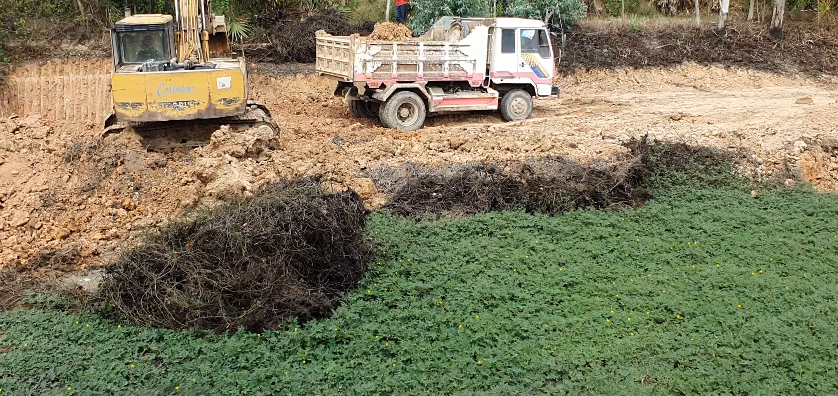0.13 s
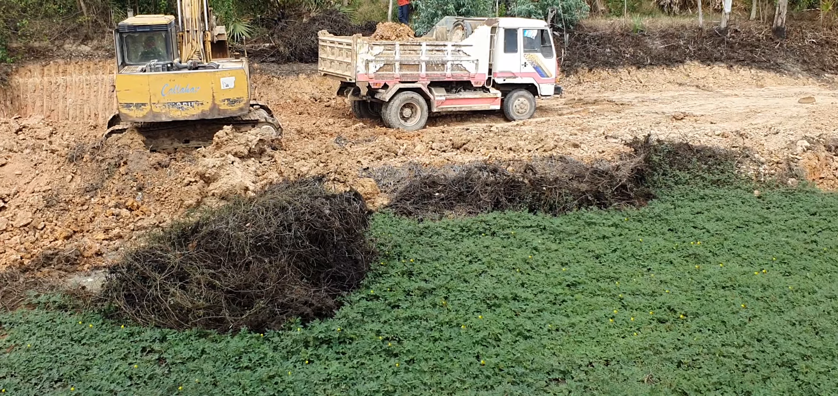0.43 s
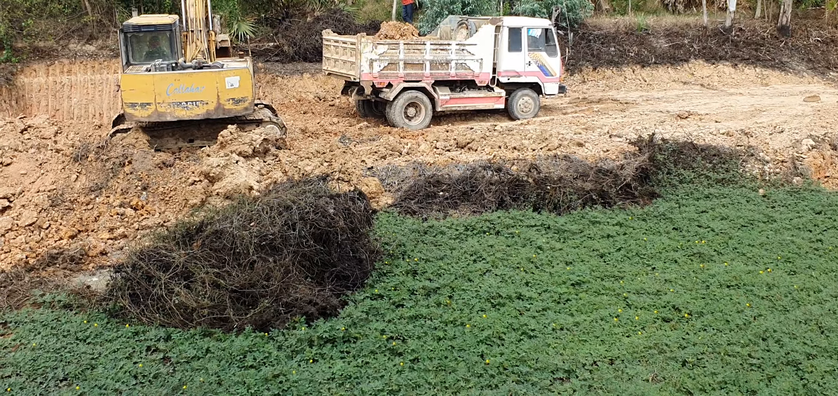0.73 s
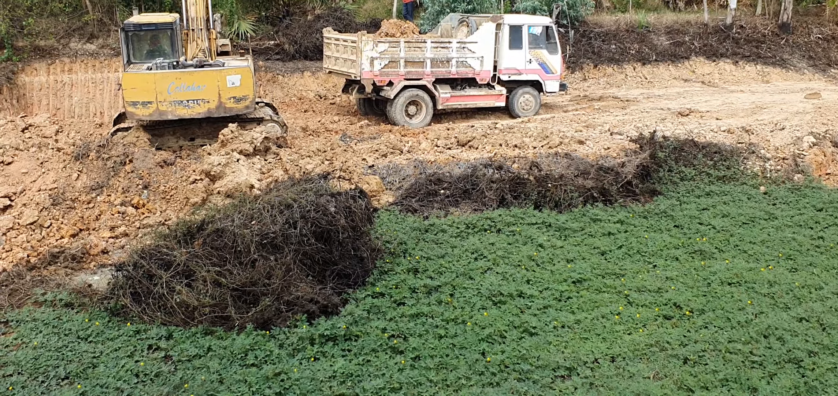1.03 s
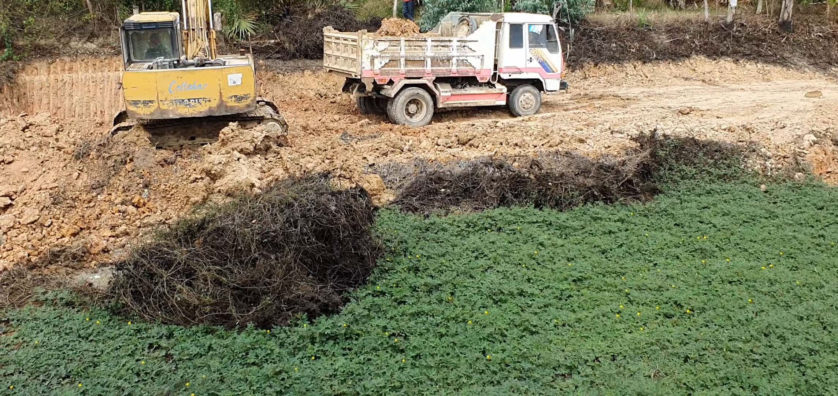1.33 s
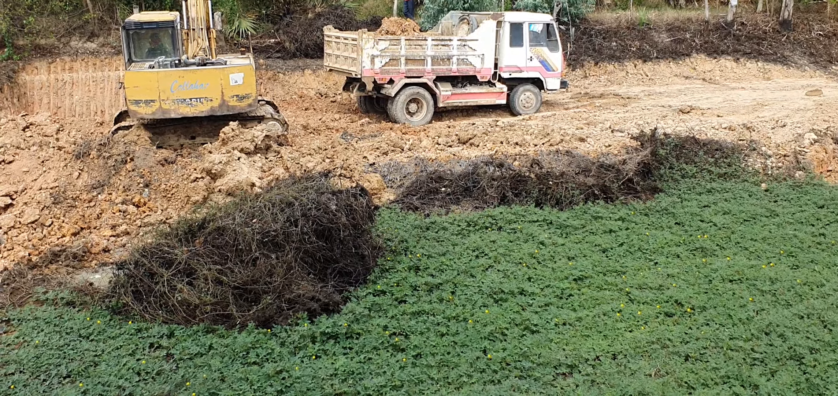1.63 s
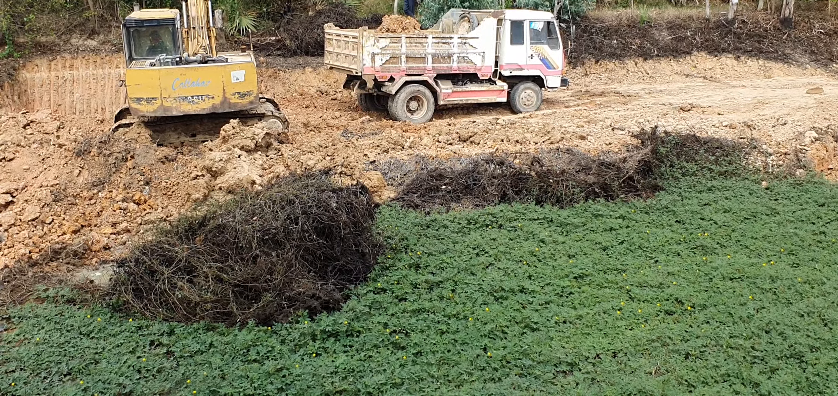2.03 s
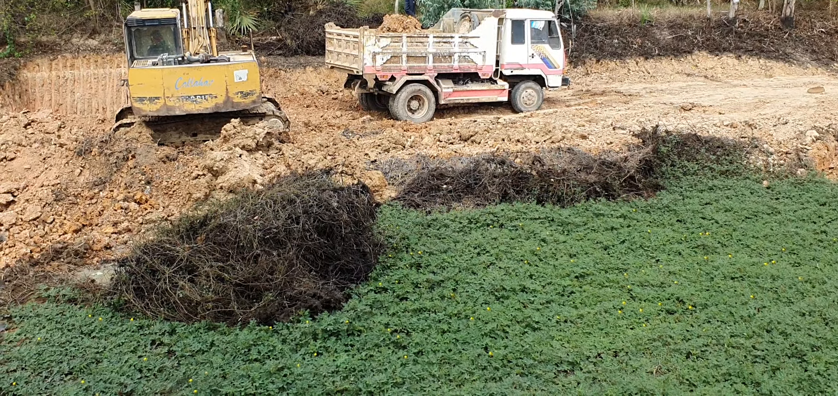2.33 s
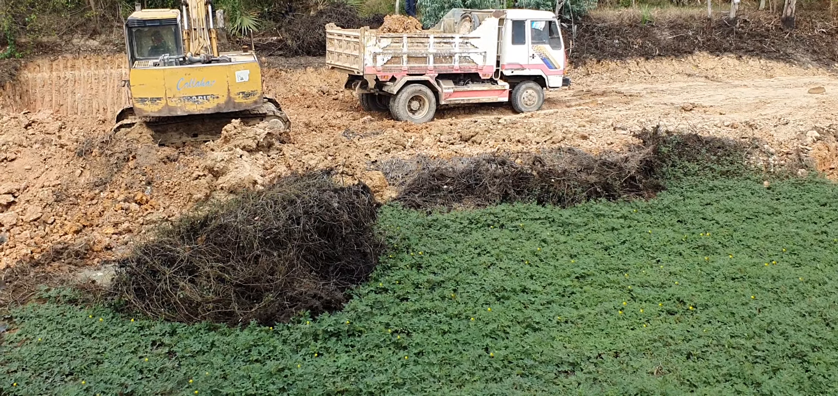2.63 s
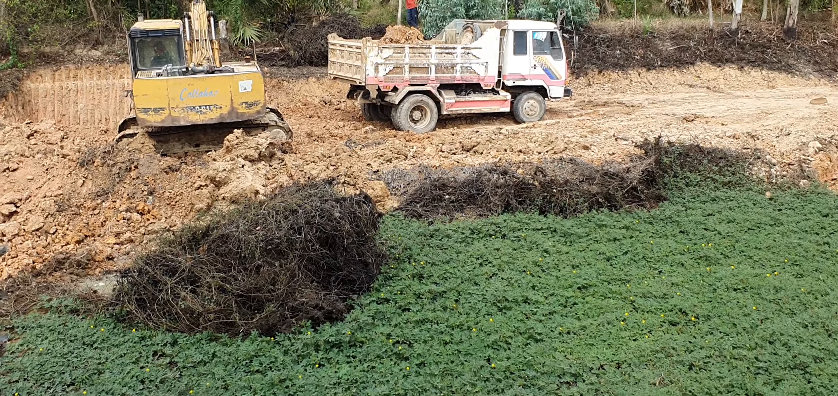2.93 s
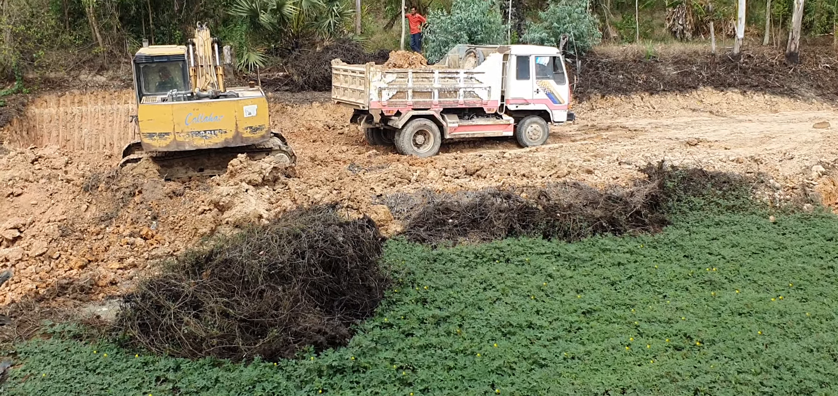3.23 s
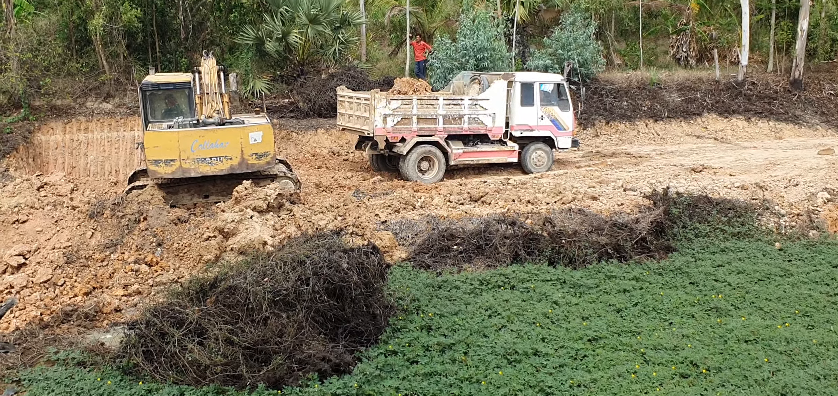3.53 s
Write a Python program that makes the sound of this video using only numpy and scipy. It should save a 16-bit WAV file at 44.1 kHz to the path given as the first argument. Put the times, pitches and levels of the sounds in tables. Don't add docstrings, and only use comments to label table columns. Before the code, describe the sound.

An excavator's diesel engine rumbles steadily with fan roar and a low hydraulic whine, some way off in an open field; midway the bucket knocks dully, then loose metal ticks; stereo microphone, slightly left, no echo.

```python
import sys
import numpy as np
from scipy import signal
from scipy.fft import rfft, irfft
from scipy.io import wavfile

SR = 44100
rng = np.random.default_rng(int(sys.argv[2]) if len(sys.argv) > 2 else 0)


def file_out(sig):
    cols = np.atleast_2d(sig).T
    lim = np.clip(cols, -1, 1)
    pcm = np.round(lim * 32767).astype(np.int16)
    wavfile.write(sys.argv[1], SR, pcm)


def elevation(decibels):
    levels = np.asarray(decibels, float)
    return 10 ** (levels / 20)


N = 161847
PUMP_PER_FIRING = 5
TOP_HZ = 15750


def in_time(rows):
    s, *columns = np.transpose(rows)
    return [np.interp(np.arange(N) / SR, s, column) for column in columns]


def at_hz(points, hz):
    points = np.array(points)
    return np.interp(np.log(hz + 1), np.log(points[:, 0]), points[:, 1])


def rms_one(x):
    return x / np.sqrt(np.mean(x ** 2) + 1e-20)


def drift(rate):
    r = np.exp(-80 * np.pi * rate / SR)
    slow = signal.lfilter([1], [1, -2 * r, r * r], rng.standard_normal(N // 40 + 2002))
    slow = slow[2000:]
    return np.interp(np.arange(N) / 40, np.arange(len(slow)), rms_one(slow - slow.mean()))


def ring(clicks, hz, t60):
    r, w = elevation(-60 / (t60 * SR)), 2 * np.pi * hz / SR
    return signal.lfilter([0, np.sin(w)], [1, -2 * r * np.cos(w), r * r], clicks + 1e-18)


def pan(x, db):
    return x * np.array([[2 * elevation(db)], [2]]) / (1 + elevation(db))


def hiss(colour_db, patchy_db):
    # f/Hz, share (0..1)
    likeness = [(60, .97), (300, .97), (800, .85), (1500, .64), (2500, .52), (3300, .2), (6200, .52),
                (7500, .27)]
    hz = np.fft.rfftfreq(N, 1 / SR)
    shared, *own = rfft(rng.standard_normal((3, N)))
    alike = np.clip(at_hz(likeness, hz), 0, 1)
    pair = np.sqrt(alike) * shared + np.sqrt(1 - alike) * np.array(own)
    pair = pair * elevation(colour_db(hz))
    if not patchy_db:
        return rms_one(irfft(pair, N))
    place = np.clip(2 * np.log2((hz + 1) / 40), 0, 17)
    together = drift(2.5)
    out = 0
    for k in range(18):
        band = irfft(pair * np.clip(1 - abs(place - k), 0, 1), N)
        out = out + band * elevation(patchy_db * (0.3 * together + drift(11.7)))
    return rms_one(out)


def truck_idle():
    phase = 2 * np.pi * 69.1 * np.arange(N) / SR + drift(1.3)
    return np.sqrt(2) * pan(elevation(-39.5 + 0.83 * drift(3)) * np.sin(phase), 1.5)


def roar():
    # f/Hz, level/dB per Hz
    low = [(25, -36), (45, -2), (80, -2.5), (150, -4.5), (230, -1), (340, -1.5), (450, -6), (700, -9)]
    high = [(800, -2.5), (1300, -5), (2900, -15), (3600, -19.5), (6500, -31.5), (9800, -32.5), (11500, -31),
            (15700, -35)]
    # f/Hz, width/Hz, level/dB
    panels = [(587, 17.4, 10), (371, 9.6, 5), (492, 43, 3), (833, 145, 3.5), (1156, 29, 5), (1735, 46, -13),
              (427, 37, -3), (157, 8.5, -25), (330, 8.7, -3), (540, 8.2, 4), (1920, 910, 6.5),
              (7640, 830, -2.5), (14800, 1200, -1), (6330, 720, 7)]

    def colour(hz):
        base = np.where(hz < 750, at_hz(low, hz), at_hz(high, hz) - 9)
        return base + sum(db / (1 + (2 * (hz - f) / width) ** 2) for f, width, db in panels)
    return elevation(-26.5) * hiss(colour, patchy_db=0.8)


def earth_slides():
    # start t/s, attack/s, decay/s, level/dB, centre f/Hz, width/octaves
    pours = [
        (0.922, 0.02, 0.12, -40.5, 2770, 0.85),
        (1.765, 0.35, 0.36, -41, 1980, 0.45),
        (2.6, .01, 0.085, -55, 1300, 1.3),
    ]
    out, t = 0, np.arange(N) / SR
    for s, attack, decay, db, hz, wide in pours:
        after = np.maximum(t - s, 0)
        shape = np.minimum(after / attack, 1) * np.exp(-np.maximum(after - attack, 0) / decay)
        grains = hiss(lambda f: -12 * (np.log2((f + 1) / hz) / wide) ** 2, patchy_db=0)
        out = out + elevation(db + 2.0 * drift(30)) * shape * grains
    return out


def pin_squeaks():
    # start t/s, length/s, f/Hz, level/dB
    squeaks = [
        (.45, .15, 8750, -60),
        (.49, .15, 8450, -62),
    ]
    out, t = np.zeros(N), np.arange(N) / SR
    for s, length, hz, db in squeaks:
        bow = np.sin(np.pi * np.clip((t - s) / length, 0, 1)) ** 0.54
        out += elevation(db + 2.7 * drift(30)) * bow * np.sin(2 * np.pi * hz * t + 1.2 * drift(40))
    return pan(out, -1.5)


def metal_ticks():
    # t/s, level/dB, pitch factor
    ticks = [(0.5921, -47, 1), (1.7056, -50, 1.9), (1.734, -49, 1.9), (2.0683, -52, 2.6),
             (2.5043, -48, 1.85), (2.5342, -53, 1.9), (2.652, -50, 1), (2.7604, -45, 1), (3.075, -54, 1.5),
             (3.1602, -47, 1), (3.1802, -48, 1), (3.182, -54, 1.5), (3.2326, -49, 1), (3.2345, -50, 1.5),
             (3.2544, -46, 1), (3.2715, -45, 1), (3.3094, -48, 1), (3.4925, -49, 1), (3.6003, -46, 1)]
    # f/Hz, level/dB, t60/s
    modes = [(5700, -2, .025), (6000, -3, .02), (5300, -8, .025), (4700, -15, .02), (8450, -15, .02),
             (8900, -16, .02)]
    out = np.zeros(N)
    s, db, pitch = np.transpose(ticks)
    chance_db = rng.normal(0, 2.1, (len(s), len(modes)))
    for k, (hz, mode_db, t60) in enumerate(modes):
        heights = elevation(db + mode_db + 5.5 + chance_db[:, k])
        for size in set(pitch):
            clicks = np.zeros(N)
            clicks[(s * SR).astype(int)] = heights * (pitch == size) * (hz * size < TOP_HZ)
            out += ring(clicks, min(hz * size, TOP_HZ), t60)
    return pan(out, -1.5)


def bucket_knocks():
    # t/s, level/dB, pitch factor, other modes re main/dB, ring length factor
    hits = [
        (.966, -15, .942, -18, 1.7),
        (1.593, -19, 1.0, -1, 1),
        (1.616, -32, 1.0, 9, 1.2),
    ]
    # f/Hz, level/dB, t60/s
    bucket = [(345, 2, .25), (904, 0, .085), (1147, -3, .2), (1249, -3, .08), (1362, -6, .09),
              (1523, 0, .12), (1857, -4, .1), (2008, -7, .13), (2229, -7, .11)]
    dull_hz, thud_db, thud_t60, main_mode = 2700, -8.5, 0.13, 1
    out, t = np.zeros(N), np.arange(N) / SR
    thud_band = signal.butter(2, [300, dull_hz], "band", fs=SR, output="sos")
    grit = rms_one(signal.sosfilt(thud_band, rng.standard_normal(N)))
    for s, db, pitch, rest_db, longer in hits:
        click = elevation(db) * (np.arange(N) == int(s * SR))
        for k, (hz, mode_db, t60) in enumerate(bucket):
            height_db = mode_db - 4 + rest_db * (k != main_mode) + rng.standard_normal()
            out += elevation(height_db) * ring(click, hz * pitch, t60 * longer)
        fall_db = 60 * np.maximum(t - s, 0) / thud_t60
        out += (t > s) * elevation(db + rest_db + thud_db - fall_db) * grit
    return pan(signal.sosfilt(signal.butter(6, dull_hz, fs=SR, output="sos"), out), 1.1)


def valve_clatter(turns):
    # t/s, level/dB
    load = [(0, -74), (.35, -60), (.9, -66), (1.3, -53.5), (1.6, -50.5), (1.72, -48), (2.0, -52),
            (2.16, -51.5), (2.3, -57), (2.5, -54), (2.95, -71), (3.25, -55), (3.45, -69), (3.67, -55)]
    # f/Hz, level/dB per Hz
    bright = [(3000, -3.5), (5700, 5), (7300, -6.5), (8500, 0), (9800, -9), (11300, 1), (13500, -11),
              (14700, 1)]

    def colour(hz):
        return at_hz(bright, hz) - 30 * (hz < 2000)
    since = turns - 0.29 + 1
    firing, part = since.astype(int), since % 1
    chance_db = 2.0 * np.clip(rng.standard_normal(400), -1.5, 1.5)
    size_db = chance_db[firing] - 2.0 * (firing % 2)
    puff = rms_one(elevation(size_db) * part ** 2 * np.exp(-part * 5 * 1.17))
    valves = puff * hiss(lambda hz: colour(hz) - 6.6 * np.clip((hz - 15000) / 700, 0, 1), patchy_db=0)
    blow_by = elevation(-3.5) * hiss(lambda hz: colour(hz) - 3.3 * (hz / 7000) ** 2, patchy_db=0)
    return elevation(in_time(load)[0]) * (valves + blow_by)


def pump_whine(turns, whine_db):
    # t/s, level/dB
    swells = [(.08, -42), (.3, -40), (.43, -34), (.58, -43), (.775, -36), (.82, -28.5), (.85, -36),
              (1.09, -35), (1.4, -42), (1.56, -39), (1.63, -34), (1.7, -29.5), (2.03, -32), (2.25, -35),
              (2.45, -39), (2.97, -44.5), (3.42, -34)]
    t = np.arange(N) / SR
    angle = 2 * np.pi * PUMP_PER_FIRING * turns + 0.03 * drift(38)
    level_db = whine_db + 0.3 * drift(5.3) + 0.5 * drift(41)
    whine = pan(elevation(level_db) * -np.cos(angle), 8.5)
    swell = elevation(whine_db - 22.5)
    for s, db in swells:
        swell = swell + elevation(db) * np.exp(-((t - s) / 0.021) ** 2)
    overtone = pan(swell * elevation(drift(8.9)) * -np.cos(2 * angle), 0.78)
    return np.sqrt(2) * (whine + overtone)


def exhaust_throb(turns, throb_db):
    # multiple of firing rate, level/dB re throb, left-right/dB, wobble/dB
    orders = [(1, 0, 1.9, 0.5), (2, -5.5, 2, 1.5), (3, -13.5, 7.5, 1), (4, -19, -3, 5), (1.5, -18, -3, 5.5),
              (2.5, -22.5, 7, 0.5), (.75, -24, -9, 3.5)]
    out = np.zeros((2, N))
    usual_db = throb_db.mean()
    for k, db, side_db, wobble_db in orders:
        follow = 0.11 if k > 1 else 1
        level_db = usual_db + (throb_db - usual_db) * follow + db + wobble_db * drift(8.5)
        start = rng.random() * (k % 1 > 0)
        out += pan(elevation(level_db) * -np.cos(2 * np.pi * (k * turns + start)), side_db)
    return np.sqrt(2) * out


def ear_balance(noise):
    # f/Hz, level/dB
    balance = [(100, 2), (900, .5), (1700, -4), (3000, 3.5), (5300, 3), (6200, -.5), (9000, -.5),
               (12800, 4.5)]
    hz = np.fft.rfftfreq(N, 1 / SR)
    side_db = at_hz(balance, hz) - 4 * np.clip((hz - 13500) / 2000, 0, 1)
    return irfft(rfft(noise) * elevation(side_db * np.array([[0.5], [-0.5]])), N)


def scene():
    # t/s, whine f/Hz, whine level/dB
    speed = [(0, 279.2, -20), (.2, 279.5, -19.5), (.45, 284.8, -20.5), (.7, 287.3, -22),
             (.92, 288.8, -21.5), (1.08, 279.5, -20), (1.7, 279.6, -19.5), (1.8, 277, -20.5),
             (2.45, 275.8, -19.5), (2.6, 274.7, -20), (2.85, 273.4, -19.5), (3.3, 272.5, -22.5),
             (3.67, 273.4, -20.5)]
    # t/s, throb level/dB, roar level/dB
    effort = [(0, -27.5, -1), (.3, -28, 0), (.55, -29, .5), (.9, -31.5, .5), (1.1, -28, 0.5), (1.5, -26, 0),
              (1.85, -26, 1), (2.2, -26, 1.5), (2.7, -26.5, 0), (3.2, -24.5, 0), (3.67, -25, 0)]
    whine_hz, whine_db = in_time(speed)
    throb_db, roar_db = in_time(effort)
    turns = np.cumsum(whine_hz) / PUMP_PER_FIRING / SR
    noises = ear_balance(elevation(roar_db) * roar() + earth_slides() + valve_clatter(turns))
    steel = pin_squeaks() + metal_ticks() + bucket_knocks()
    engine = pump_whine(turns, whine_db) + exhaust_throb(turns, throb_db)
    return truck_idle() + noises + steel + engine


def low_pass(x):
    return signal.sosfilt(signal.butter(12, 16530, fs=SR, output="sos"), x)


def record(dry):
    # f/Hz, phase/rad; above the table a plain lag
    port_lead = [(300, .2), (560, .45), (1120, 1.0), (1900, 2.6), (3000, 6.0), (3800, 10.2), (5860, 13.9),
                 (7200, 18.4)]
    hz, t = np.fft.rfftfreq(N, 1 / SR), np.arange(N) / SR
    edges = np.sin(np.pi / 2 * np.clip(np.minimum(t, t[-1] - t) / 0.004, 0, 1)) ** 2
    lag_s = 0.000254
    lead = at_hz(port_lead, hz) + 2 * np.pi * lag_s * np.maximum(hz - port_lead[-1][0], 0)
    ports = rfft(dry * edges) * (hz < TOP_HZ) * np.exp(-1j * lead * np.array([[0], [1]]))
    return low_pass(irfft(ports, N) * edges)


dry = scene()
out = record(dry)
file_out(out)
```